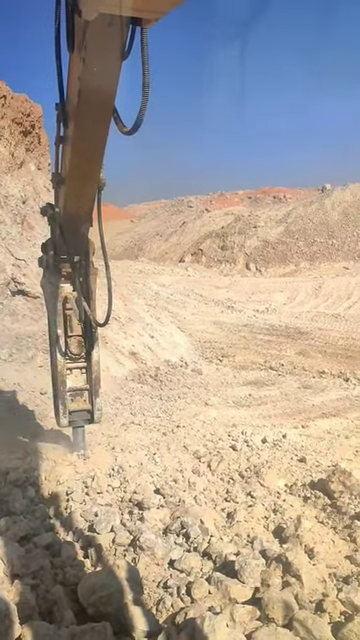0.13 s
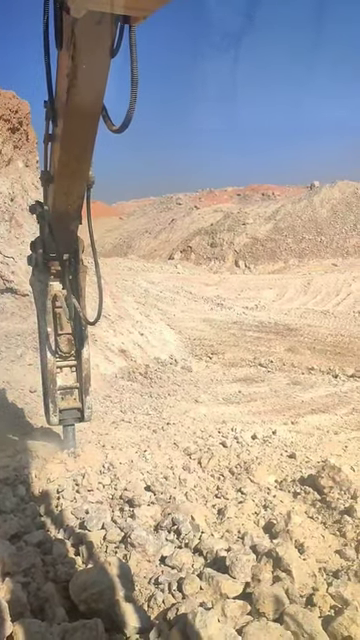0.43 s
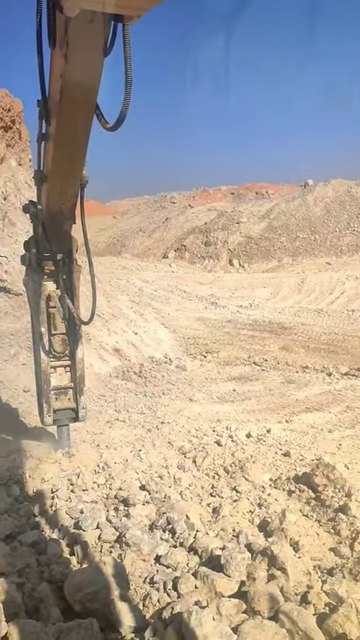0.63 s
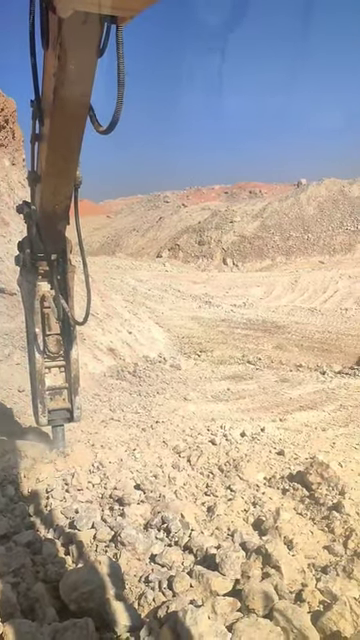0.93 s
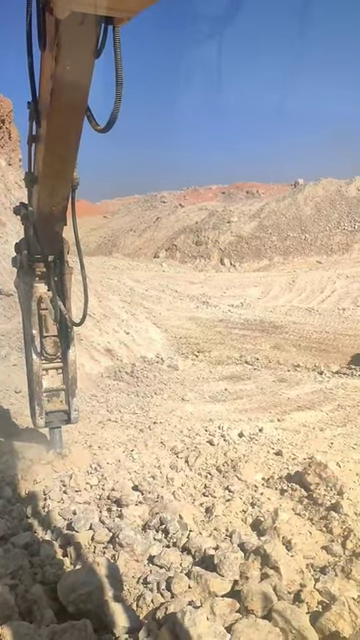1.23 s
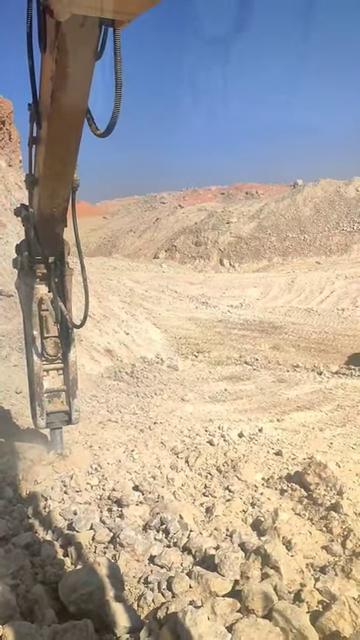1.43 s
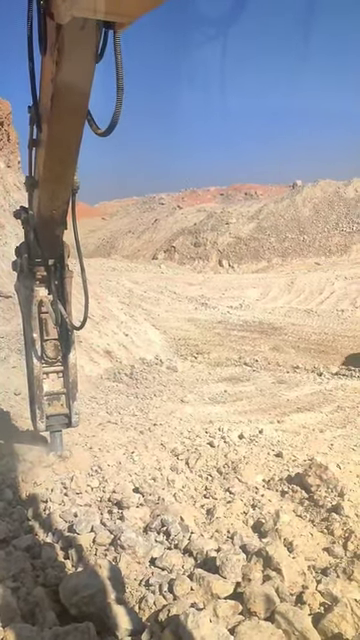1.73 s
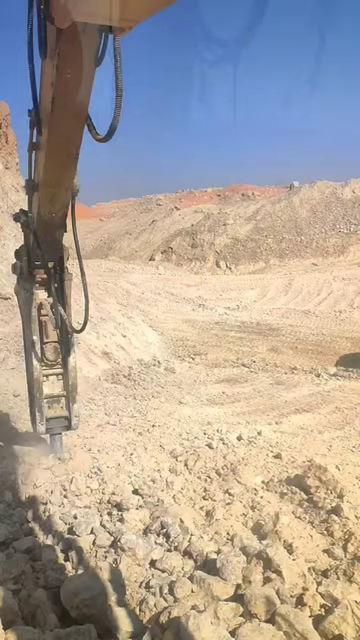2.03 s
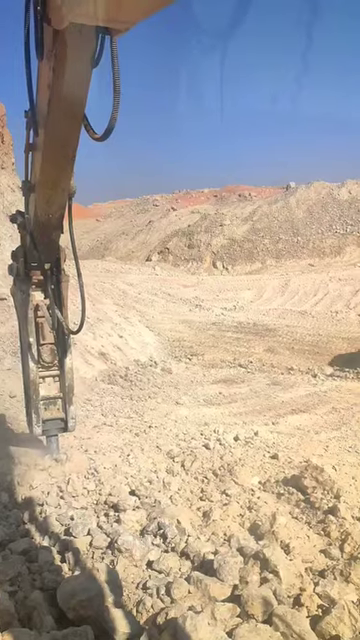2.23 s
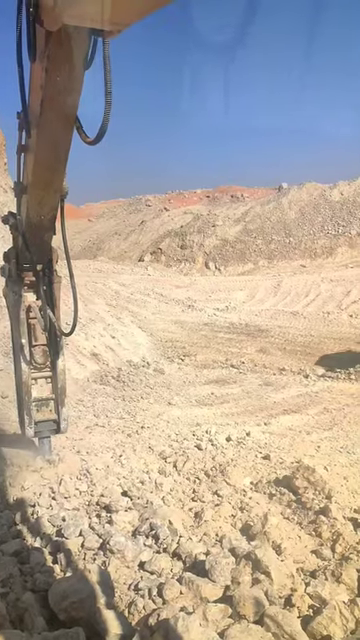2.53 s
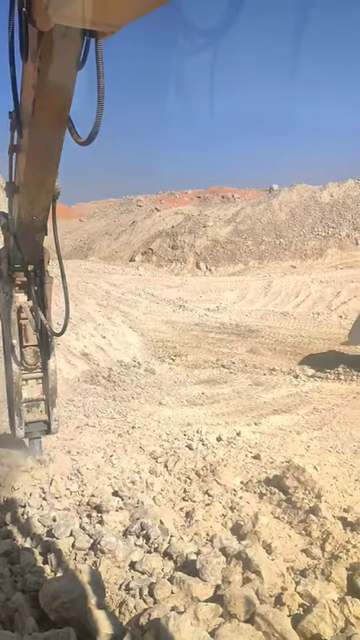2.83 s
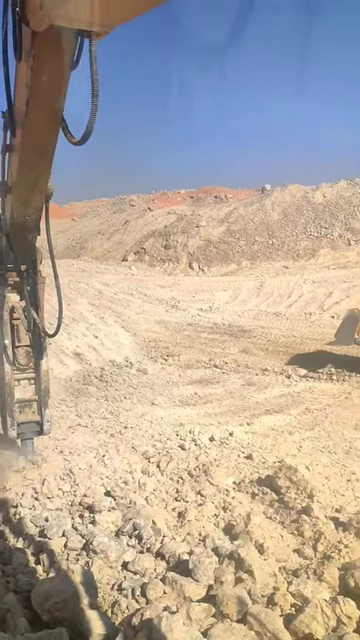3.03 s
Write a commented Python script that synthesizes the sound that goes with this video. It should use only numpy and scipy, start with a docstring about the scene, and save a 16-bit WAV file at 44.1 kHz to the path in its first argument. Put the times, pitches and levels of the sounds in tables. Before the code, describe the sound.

Rapid rock hammering from start to finish, heard from the operator's cab: booming low thumps, metallic clanks, gritty chatter and thin steel ringing, with the digger's engine droning quietly underneath and slightly overloaded peaks.

```python
"""A hydraulic breaker hammers rock about eight times a second, heard from inside the excavator's cab.
Each blow shakes the cab (low swelling modes), clanks the boom (struck modes) and rattles the steel
until the stroke ends (gated noise through resonances). Thin steel tones ring on top.
The engine rumbles underneath: shaped noise with drones and drifting tones."""
import sys
import numpy as np
from scipy import signal
from scipy.fft import rfft, irfft, next_fast_len
from scipy.io import wavfile
from scipy.ndimage import uniform_filter1d, map_coordinates

SR = 44100
rng = np.random.default_rng(int(sys.argv[2]) if len(sys.argv) > 2 else 0)


def to_wav(sig):
    """Store sig (one row per channel, or 1-D mono) as 16-bit WAV at the path in sys.argv[1].

    Samples outside -1..1 are clipped; the rate is SR.
    """
    pcm = np.clip(np.atleast_2d(sig), -1, 1) * 32767
    pcm = np.round(pcm).astype(np.int16)
    wavfile.write(sys.argv[1], SR, pcm.T)  # frames by channels


def amplitude_ratio(level_db):
    """Convert a level in decibels to the matching linear amplitude (field) ratio."""
    exponent = np.asarray(level_db, float) / 20
    return 10 ** exponent


N = 140238

PORTS = np.array([[0.5], [-0.5]])  # left and right, half a spread either way
RING_SPREAD = 1.48  # phase between the ports [rad], for boom and whine
RISE_LEAD_S, RISE_S = 0.009, 0.015  # noise bursts start ahead of the blow and rise this fast


def unit(x):
    """Scale to rms 1."""
    return x / np.sqrt(np.mean(x ** 2) + 1e-20)


def along(points, hz):
    """Reads (frequency [Hz], value) points on a log frequency axis."""
    f, v = np.transpose(points)
    return np.interp(np.log(hz + 1), np.log(f + 1), v)


def curves(rows):
    """One value per sample for each column after the time."""
    s, *cols = np.transpose(rows)
    return [np.interp(np.arange(N) / SR, s, c) for c in cols]


def wobble(rate):
    """A smooth random curve per channel, rate knots a second."""
    knots = int(N * rate / SR) + 4
    where = np.arange(N) * rate / SR
    return np.array([map_coordinates(rng.standard_normal(knots), [where]) for _ in "LR"])


def filtered(x, response):
    """x times a complex response of frequency."""
    m = next_fast_len(N + SR // 2)
    return irfft(rfft(x, m) * response(np.fft.rfftfreq(m, 1 / SR)), m)[..., :N]


# Left-right likeness of the noise: (frequency [Hz], correlation [-1..1])
LIKENESS = [(60, 0.39), (180, 0.99), (520, 0.65), (1550, -0.19), (4590, -0.048), (13600, -0.012)]


def rush(spectrum):
    """Stereo noise of rms 1, its left-right likeness set by frequency."""
    def mid_side(hz):
        turn = np.arccos(np.clip(along(LIKENESS, hz), -1, 1)) / 2
        return amplitude_ratio(along(spectrum, hz)) * [np.cos(turn), np.sin(turn)]
    mid, side = filtered(rng.standard_normal((2, N)), mid_side)
    return unit(np.array([mid + side, mid - side]))


def patchy(x, depth_db):
    """Random gain patches over time and frequency, then rms 1."""
    z = signal.stft(x, nperseg=256)[2]
    field = rng.standard_normal(z.shape[1:])
    field = uniform_filter1d(uniform_filter1d(field, size=4, axis=0), size=5, axis=1)
    return unit(signal.istft(z * amplitude_ratio(depth_db * unit(field)), nperseg=256)[1][:, :N])


def ringing(x, peaks):
    """x plus its ringing in narrow resonances."""
    def response(f):
        return 1 + sum(amplitude_ratio(db) * 1j * f * width / (hz * hz - f * f + 1j * f * width)
                       for hz, width, db in peaks)
    return filtered(x, response)


def gate(t, hold, sag_db, fall_db):
    """Rise, slow sag while the stroke holds, quick release; sag and fall in dB per second."""
    rise = 1 - np.exp(-(t / RISE_S) ** 2)
    return rise * amplitude_ratio(-sag_db * t - fall_db * np.maximum(t - hold, 0))


# Every blow, levels relative within each layer:
# (time [s], rattle [dB], boom clank [dB], treble hiss [dB], hold [s])
BLOWS = [(-0.054, -24.0, -38, -36.5, 0.048), (0.0574, -26.5, -22, -41.5, 0.07),
         (0.1804, -25, -23.5, -39, 0.051), (0.2984, -27, -24, -41.5, 0.06),
         (0.4164, -26.5, -22.5, -41.5, 0.058), (0.5344, -27, -22, -42, 0.067),
         (0.6559, -29, -23.5, -42.5, 0.068), (0.7801, -26.5, -23, -41, 0.061),
         (0.9004, -28, -24, -42, 0.061), (1.0206, -26, -25.5, -42, 0.059), (1.1374, -27, -26, -43, 0.071),
         (1.2635, -26.5, -25, -43, 0.057), (1.3862, -27.5, -31, -42.5, 0.053),
         (1.5054, -27, -26, -41.5, 0.054), (1.6254, -27, -41, -43, 0.073), (1.7569, -28.5, -35, -42, 0.06),
         (1.8754, -26.5, -39, -42.5, 0.058), (2.0014, -26.5, -36, -43.5, 0.071),
         (2.1244, -28.5, -40, -42.5, 0.078), (2.2504, -26.5, -29, -40.5, 0.065),
         (2.382, -26, -36, -39, 0.044), (2.5044, -26.5, -38, -40.5, 0.055),
         (2.6304, -26, -31.5, -40.5, 0.051), (2.761, -26.5, -24.5, -42, 0.043),
         (2.889, -24, -29.5, -40, 0.026), (3.0104, -27, -36, -40, 0.043), (3.1324, -30.5, -32, -41, 0.067)]


def per_blow(shape, channels=1, lead=0, rows=BLOWS):
    """Adds half a second of shape(t, row) for every blow, lead seconds ahead of its time."""
    out = np.zeros((channels, N + 2 * SR))
    t = np.arange(SR // 2) / SR
    for row in rows:
        start = round((row[0] - lead + 0.5) * SR)  # half a second of margin in front
        out[:, start:][:, :len(t)] += shape(t, row)
    return out[:, SR // 2:][:, :N]


# The blow arriving through the arm: (time [s], upper boom mode [dB], lower boom mode [dB])
JOLTS = [(-0.064, -37, -38), (0.0614, -20, -31), (0.181, -19.5, -37), (0.3002, -21, -39),
         (0.4175, -24.5, -37), (0.536, -23, -33), (0.6577, -19.5, -31), (0.7793, -21.5, -39),
         (0.8991, -20, -45), (1.0199, -23, -38), (1.1403, -26, -45), (1.2637, -38, -33),
         (1.3854, -27.5, -23), (1.5088, -41, -38), (1.6306, -27, -37), (1.7575, -25.5, -39),
         (1.8802, -24, -50), (2.0034, -24, -23), (2.1281, -23, -18), (2.2547, -19.5, -19),
         (2.379, -26.5, -40), (2.5051, -22, -18), (2.6313, -26.5, -40), (2.7577, -26.5, -36),
         (2.8852, -28, -27), (3.0115, -25.5, -28), (3.1358, -43, -32)]


def shaken(modes):
    """Modes that swell and die after each jolt, scaled together to rms 1."""
    def shape(t, row):
        total = 0
        for hz, db, lag, swell in modes:
            u = np.maximum(t - lag, 0)
            level = amplitude_ratio(db + rng.normal(0, 1.2))  # scatter from blow to blow [dB]
            total = total + level * u / swell * np.exp(1 - u / swell) * np.sin(2 * np.pi * hz * u)
        return total
    return unit(per_blow(shape, rows=JOLTS))


# Cab modes, levels relative within a group: (frequency [Hz], level [dB], lag [s], swell [s])
HEAVE = [(8.2, -1, .031, .06), (16.3, 0, .045, .05), (33, -4, .043, .03)]  # slow heave
SWAY = [(40.18, -3.5, 0.016, 0.058), (56.4, -4.5, 0.02206, 0.015)]  # cab on its mounts
PANEL = [(75, 0, .0085, .07)]
FLOOR = [(88.65, 1.5, 0.0252, 0.047), (100.1, 2, 0.0226, 0.019), (111.6, -2.5, 0.02317, 0.017)]  # floor plate
THUD = [(37.05, 0, 0.006, 0.023)]
# How hard the cab is shaken, rms of each group:
# (time [s], heave [dB], sway [dB], panel [dB], floor plate [dB], thud [dB])
SHAKE = [(0.0, -15.5, -10, -24, -54, -22.5), (0.1, -19, -21.5, -26, -29, -20.5),
         (0.999, -19, -18, -24.5, -32, -40), (1.452, -19.5, -17.5, -25, -38.5, -47),
         (2.35, -15, -19.5, -33.5, -29.5, -25), (2.97, -17, -20, -43, -34.5, -20.5),
         (3.05, -12.5, -19.5, -30, -32, -18), (3.1, -23, -21, -52, -31, -25.5)]


def cab():
    """Low modes that swell and die after each blow; the thud starts with a drop in pressure."""
    groups = [shaken(HEAVE), shaken(SWAY), shaken(PANEL), shaken(FLOOR), -shaken(THUD)]
    low = sum(amplitude_ratio(db) * group for db, group in zip(curves(SHAKE), groups))
    # a faint copy 300 samples late, opposite in the two ports, adds width
    return low + amplitude_ratio(-24) * np.roll(low, 300, axis=1) * np.array([[1], [-1]])


# Boom modes: (frequency [Hz], level over the blow's clank [dB], t60 [s])
BOOM = [(660, -18, 0.88), (758, -14, 0.17), (852.8, 0.5, 0.49), (875, -6, 0.45)]
UPPER, LOWER = (949, 0.001945, 0.17), (452, 0.024, 0.16)  # (frequency [Hz], lag [s], t60 [s])


def boom():
    """Struck modes of the arm, damped when the tool seats again; two depend on how the tool sits."""
    lag_s, damped_s, fade_s = 0.007996, 0.064, 0.013

    def shape(t, row):
        _, upper_db, lower_db, clank_db = row
        modes = [(hz, lag_s, t60, clank_db + db) for hz, db, t60 in BOOM]
        modes += [(*UPPER, upper_db), (*LOWER, lower_db)]
        ring = 0
        for hz, lag, t60, db in modes:
            u = np.maximum(t - lag, 0)
            decay = amplitude_ratio(db + rng.normal(0, 0.62, (2, 1)) - 60 * u / t60)
            phase = 2 * np.pi * hz * u + (RING_SPREAD + rng.normal(0, 0.3)) * PORTS
            ring = ring + decay * (1 - np.exp(-u / 0.0083)) * np.sin(phase)
        return ring / (1 + np.exp(np.minimum((t - damped_s) / fade_s, 50)))
    rows = [(*jolt, blow[2]) for jolt, blow in zip(JOLTS, BLOWS)]
    return per_blow(shape, channels=2, rows=rows)


# Colour of the rattle noise: (frequency [Hz], relative density [dB per Hz])
RATTLE = [(150, -15), (250, -6), (325, -9.5), (445, -5.5), (690, -11), (843, -9.5), (1150, -19.5),
          (3110, -21.5), (5000, -37.5), (6500, -61), (11000, -120)]
# Steel resonances: (frequency [Hz], width [Hz], level over the broad noise [dB])
STEEL = [(1399, 21, 6.5), (1629, 74, 4.5), (1937, 130, -4), (2648, 27, 7), (2852, 24, 7.5),
         (3054, 420, 0.5), (3170, 8.3, 16.5), (3652, 25, 7.5), (4025, 66, -1)]
# Hard knock inside the blow, strongest at the end as the tool meets solid rock:
# (time [s], level over the rattle [dB])
SOLID = [(0, -23), (1.9, -42), (2.3, -34), (2.8, -12.5), (3.18, 2.5)]


def rattle():
    """Loose steel chatters in its resonances after the blow, with a short knock inside it."""
    chatter = patchy(rush(RATTLE) * amplitude_ratio(1.1 * wobble(70)), depth_db=1.8)
    knock_s, knock_len_s = 0.03, 0.0036

    def shape(t, row):
        knock_db = np.interp(row[0], *np.transpose(SOLID)) + rng.normal(0, 0.61)
        knock = amplitude_ratio(knock_db) * np.exp(-((t - knock_s) / knock_len_s) ** 2)
        return amplitude_ratio(row[1]) * (gate(t, row[4], sag_db=70, fall_db=311) + knock)
    envelope = per_blow(shape, lead=RISE_LEAD_S)
    return amplitude_ratio(-1) * ringing(chatter * envelope, STEEL)


# Steel rung outright: (frequency [Hz], level over the blow's rattle column [dB], lag [s], t60 [s])
PINGS = [ (2670, -28, .008, 0.058), (2970, -18, 0.0098, 0.04), (6061, -22, 0.014, 0.2),
         (6061, -13.5, 0.0396, 0.12), (7400, -17, 0.0049, 0.081)]


def pings():
    """Narrow steel modes, each set off at its own moment of the stroke."""
    def shape(t, row):
        total = 0
        for hz, db, lag, t60 in PINGS:
            u = np.maximum(t - lag - rng.normal(0, 0.0049), 0)
            decay = amplitude_ratio(db + rng.normal(0, 2.5, (2, 1)) - 60 * u / t60)
            cycles = hz * (1 + rng.normal(0, 0.0035)) * u + rng.random((2, 1))
            total = total + decay * (1 - np.exp(-u / 0.0022)) * np.sin(2 * np.pi * cycles)
        return amplitude_ratio(row[1]) * total
    return per_blow(shape, channels=2)


# A ring that comes and goes: (time [s], level [dB])
BRACKET = [(0, -58), (.18, -32), (.5, -58), (.8, -36.5), (1.05, -40), (1.3, -47), (1.6, -53), (2.1, -61),
           (2.65, -59), (3.18, -54)]


def bracket():
    """A loose part that swells into one tone during each stroke, then dies."""
    tone_hz, lag_s, swell_s = 1642, 0.0074, 0.026

    def shape(t, row):
        u = np.maximum(t - lag_s, 0) / swell_s
        cycles = tone_hz * (1 + rng.normal(0, 0.005)) * t + rng.random((2, 1))
        return u * np.exp(1 - u * u) * np.sin(2 * np.pi * cycles)
    return amplitude_ratio(curves(BRACKET)[0]) * per_blow(shape, channels=2)


# Colour of the treble noise: (frequency [Hz], relative level [dB])
HISS = [(2350, -50), (4000, 0), (5750, -3), (6220, -8), (6450, -2), (7550, -1.5), (8300, -8.5), (9700, -14),
        (12600, -13), (14000, -17)]
# Chisel resonances: (frequency [Hz], width [Hz], level over the broad noise [dB])
CHISEL = [(5325, 28, 5.5), (6087, 49, 16.8), (7610, 54, 1.9), (8930, 210, 2.4)]


def hiss():
    """Treble of the chisel and crushed rock: gritty noise gated by each stroke."""
    grit = patchy(rush(HISS) * amplitude_ratio(2.2 * wobble(160)), depth_db=2.5)

    def shape(t, row):
        return amplitude_ratio(row[3]) * gate(t, row[4], sag_db=22.5, fall_db=305)
    envelope = per_blow(shape, lead=RISE_LEAD_S)
    return amplitude_ratio(-2.5) * ringing(grit * envelope, CHISEL)


# Long steel ring, before its flicker: (time [s], level [dB])
WHINE = [(0.0, -44), (.3, -49), (0.8, -66), (1.5, -48), (1.75, -53), (2.0, -41), (2.3, -36), (2.5, -59),
         (2.7, -47), (3.18, -46)]


def whine():
    """A thin, rough steel tone, struck afresh by each blow and never quite silent."""
    tone_hz, waver_hz = 3176, 10.8
    t60_s, rest_db = 0.36, -16

    def shape(t, row):
        return (1 - np.exp(-t / 0.004)) * amplitude_ratio(-60 * t / t60_s)
    struck = per_blow(shape) + amplitude_ratio(rest_db)
    phase = 2 * np.pi * np.cumsum(tone_hz + waver_hz * wobble(44.96)[0]) / SR
    phase = phase + RING_SPREAD * PORTS + 0.53 * wobble(29.8)
    flicker_db = 4 * wobble(80)
    return struck * amplitude_ratio(curves(WHINE)[0] + flicker_db) * np.sin(phase)


# Colour of the rumble: (frequency [Hz], relative level [dB])
ENGINE = [(53, -26), (90, 4.5), (136, -6.5), (240, -15), (327, -13.5), (444, -13.5), (929, -19.5),
          (1190, -29), (3110, -33.5), (4880, -44), (6230, -43.5), (12000, -57), (15600, -92), (22000, -120)]
# Drones: (frequency [Hz], width [Hz], level over the rumble [dB])
DRONES = [(167, 8.6, 3), (229.7, 25, 8.5), (247.6, 9.1, 0.5), (453.5, 9.7, 4.5), (629.3, 9, 8.5),
          (752, 9.8, 7.5), (5940, 27, -9)]


def engine():
    """Steady rumble of shaped noise with a few resonant drones."""
    level_db = -31.5 + 0.52 * wobble(19.0)
    return amplitude_ratio(level_db) * ringing(rush(ENGINE), DRONES)


# Engine tones, before their drift and swell: (frequency [Hz], level [dB])
HUM = [(166.9, -37.5), (220, -42.5), (247.6, -40), (452.2, -50), (635.2, -54)]


def hum():
    """Engine tones that drift together in pitch and swell apart."""
    turns = np.cumsum(1 + 0.00667 * wobble(4.06)[0]) / SR  # seconds, stretched by the shared drift
    return sum(amplitude_ratio(db + 2.8 * wobble(6.82)[0]) * np.sin(2 * np.pi * (hz * turns + rng.random()))
               for hz, db in HUM)


def scene():
    """All sources, blows first and engine last."""
    blows = cab() + boom() + rattle() + pings() + bracket() + hiss() + whine()
    return blows + engine() + hum()


def top_cut(x):
    """Nothing passes above the cut-off."""
    return signal.sosfilt(signal.butter(12, 14180, fs=SR, output="sos"), x)


# Colour difference of the ports: (frequency [Hz], left minus right [dB])
TILT = [(60, .1), (250, .5), (700, 1.3), (1220, -1), (2230, -4), (4070, -4.7), (7000, -5.5), (7900, 2.5),
        (10000, 1), (13600, 0)]


def record(dry):
    """Microphone ports differ in colour and pass no steady pressure; peaks overload softly."""
    low_hz, top, knee = 4, 0.69, 3.5

    def ports(hz):
        return amplitude_ratio(along(TILT, hz) * PORTS) * hz ** 2 / (hz ** 2 + low_hz ** 2)
    x = filtered(dry, ports)
    mix = x / (1 + np.abs(x / top) ** knee) ** (1 / knee)
    return top_cut(mix)


dry = scene()
out = record(dry)
to_wav(out)
```